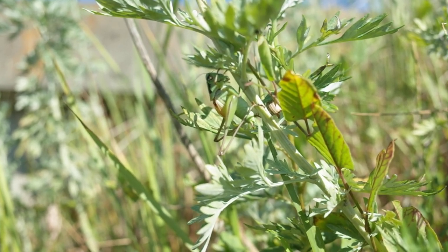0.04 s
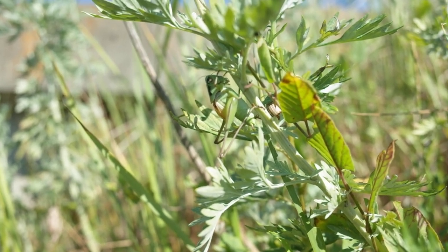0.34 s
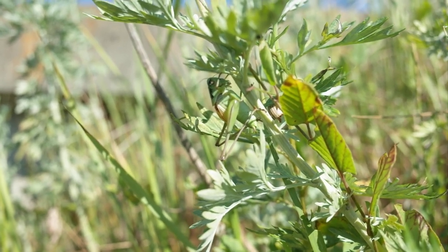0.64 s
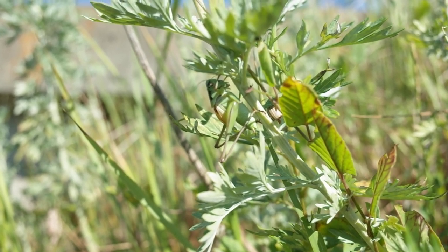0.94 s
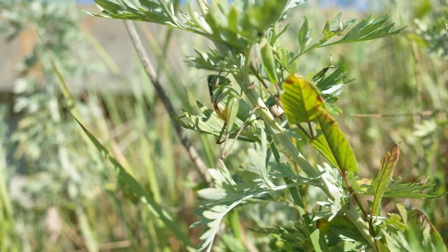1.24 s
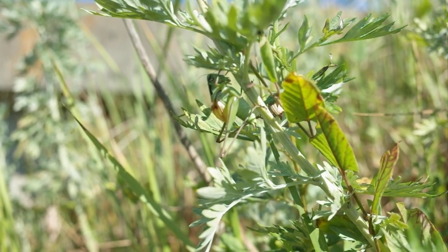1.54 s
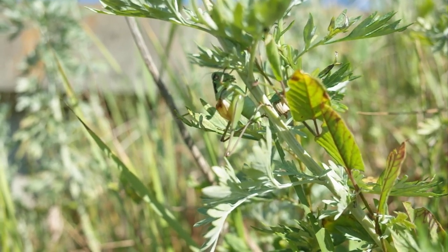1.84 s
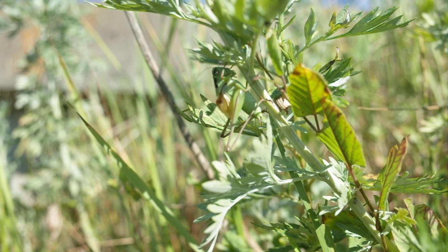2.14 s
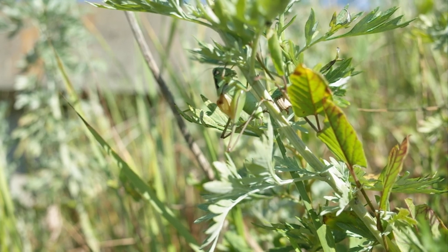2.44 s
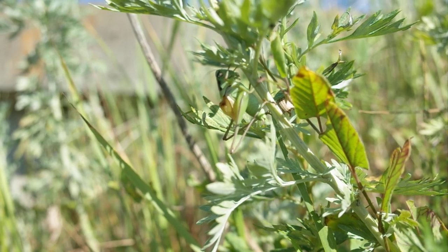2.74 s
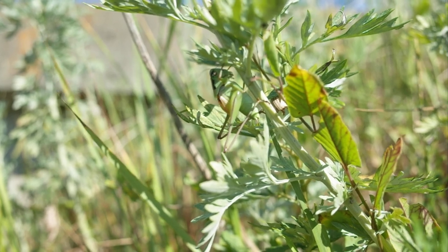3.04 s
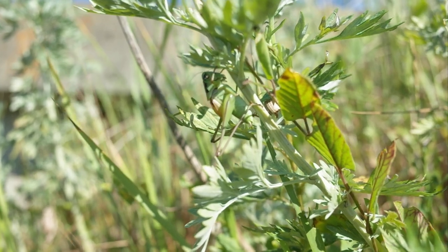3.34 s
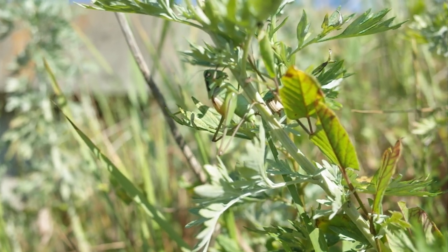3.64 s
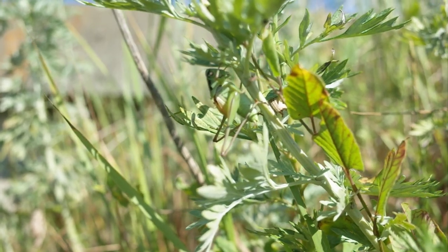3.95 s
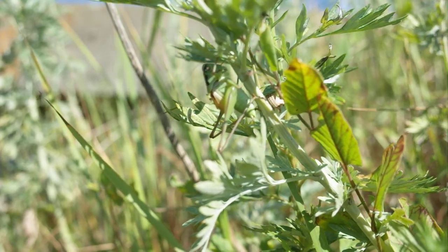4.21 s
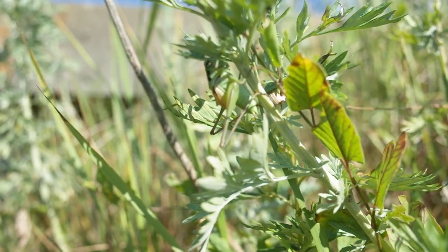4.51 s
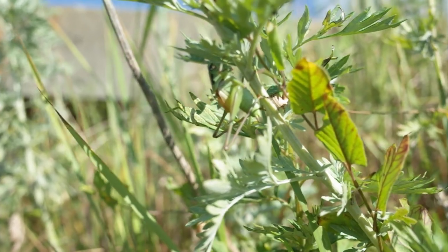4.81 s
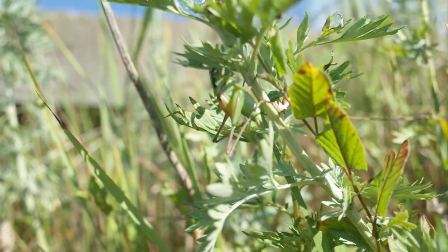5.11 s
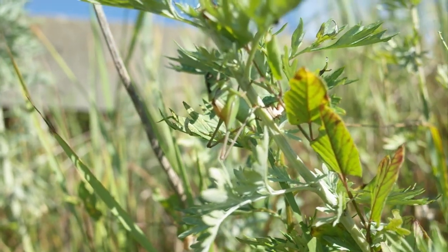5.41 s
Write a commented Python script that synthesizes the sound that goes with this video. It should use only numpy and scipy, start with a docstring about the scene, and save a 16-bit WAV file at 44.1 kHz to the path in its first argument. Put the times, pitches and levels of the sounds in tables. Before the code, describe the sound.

In a meadow, a nearby bush cricket gives a short run of high, pulsing chirps. Another, right beside the stereo microphone, takes over with a much louder, sharp, rapid buzzing song lasting about two seconds. More distant crickets follow with softer, overlapping runs, joined by a few faint stalk ticks and a barely audible passing fly, over quiet open air and a thin haze of far-off insects.

```python
"""Bush crickets in sunny weeds

Each syllable is a soft wing opening, then a loud closing stroke in which the scraper clicks over the
file tooth by tooth. One cricket sings for two seconds right at the stereo microphone and pushes the
camera's gain control down. Others sing further off, over a passing fly, ticking stalks, a low hum
and a faint outdoor rush."""
import sys
import numpy as np
from scipy import signal
from scipy.fft import rfft, irfft, next_fast_len
from scipy.io import wavfile
from scipy.ndimage import uniform_filter1d, minimum_filter1d, map_coordinates

SR = 44100
rng = np.random.default_rng(int(sys.argv[2]) if len(sys.argv) > 2 else 0)


def persist_wave(psi):
    """Save psi, clipped to +-1, as 16-bit WAV."""
    counts = np.round(np.clip(psi, -1, 1) * 32767).astype(np.int16)
    wavfile.write(sys.argv[1], SR, np.atleast_2d(counts).T)


N = 245637


# The song at the microphone. Each row: syllable end in seconds, snap (extra closing force) in dB.
NEAR_SYLLABLES = [(1.269, -0.5), (1.355, 5), (1.449, 2.9), (1.549, 3.5), (1.649, 1), (1.736, 3.5),
                  (1.841, 2.5), (1.934, 2.5), (2.029, 1), (2.129, 2.5), (2.224, 2), (2.321, 0.5),
                  (2.415, 3), (2.513, 4.5), (2.614, 4.5), (2.713, -0.5), (2.817, 3.5), (2.91, 1.5),
                  (3.017, 2.5)]
def near_song(level_db=11.5, first_length_s=.1):
    """Syllables that follow without a gap, as (end s, length s, level dB, snap dB)."""
    end, snap_db = np.transpose(NEAR_SYLLABLES)
    length = np.diff(end, prepend=end[0] - first_length_s)
    return np.column_stack([end, length, np.full(len(end), level_db), snap_db])


# The halting first syllable. Its row: end and length in seconds, level and snap in dB.
FIRST_SYLLABLE = [(1.162, .089, 5.3, 1.5)]
# The wings open, catch and close. Each row is one sweep: start and end as shares of the syllable,
# crest as a share of the sweep, peak and swell in dB, base teeth per second, jitter in tooth spacings.
FULL_STROKE = [(0, 0.268, 0.54, -18, 28, 2600, .4), (0.326, 0.469, 0.69, -12.5, 2, 2400, 0.42),
               (.48, 1, 0.74, -1.5, 8.5, 810, .1)]
HALTING_STROKE = [(.02, .35, .75, -9, 10, 1500, 0.186), (.41, .58, 0.22, -.5, 2.5, 1313, .25),
                  (0.535, 1.026, 0.59, 4.5, 9, 476.4, .2)]
# The wing's resonance from close up. Each row: frequency in Hz, relative level in dB.
NEAR_WING = [(700, -61), (2500, -55.5), (4500, -48), (5900, -36), (6930, -24), (8000, -13.5), (9000, -2.5),
             (9380, 1.5), (9800, -2.5), (10400, -2.53), (11500, -6.5), (12600, -6), (14900, -19.5),
             (15900, -20.5)]
def near_cricket():
    """Right at the microphone, with little scatter off leaves: a halting start, then full song."""
    leaves = (-9.5, .012)  # scatter dB, decay s
    song = cricket(near_song(), FULL_STROKE, NEAR_WING, leaves,
                   darken=1.62, right_lag_us=7.3, left_db=.5, uneven_db=2.08)
    start = cricket(FIRST_SYLLABLE, HALTING_STROKE, NEAR_WING, leaves,
                    darken=.42, right_lag_us=7.1, left_db=-1)
    return song + start


def cricket(syllables, stroke, wing, leaves, darken, right_lag_us, left_db, uneven_db=2.94):
    """Tooth strikes ring the wing, which starts its closing stroke bright and darkens towards the end."""
    at, size, progress = teeth(syllables, stroke, uneven_db)
    closing = progress > .335
    brightness = np.clip(darken * (.92 - progress), -.7, .7) * closing
    tilt = filtered(clicks(at, size * brightness), lambda hz: np.tanh((hz - 10300) / 1200))
    song = signal.oaconvolve(clicks(at, size) + tilt, ring(wing))[:N]
    sides = np.array([[.5], [-.5]])  # left, right
    pair = filtered(song, lambda hz: np.exp(2j * np.pi * hz * sides * right_lag_us / 1e6))
    return foliage(amp(sides * left_db) * pair, *leaves)


def teeth(syllables, stroke, uneven_db, snap_share=.82, snap_width_s=.0083):
    """Every strike of scraper on file: its time in samples, its size, its place in the syllable (0-1)."""
    strikes = []
    for end, length, db, snap_db in syllables:
        pace = np.exp(.048 * rng.standard_normal())  # wing speed differs between syllables
        for begin, finish, crest, peak_db, swell_db, rate, jitter in stroke:
            span = finish - begin
            part, force = sweep(length * span, crest, swell_db, rate * pace, jitter)
            progress = begin + span * part
            snap = snap_db * np.exp(-((progress - snap_share) * length / snap_width_s) ** 2)
            uneven = uneven_db * rng.standard_normal(256)[:len(part)]
            size = force * amp(db + peak_db + snap + uneven)
            strikes.append([(end - length * (1 - progress)) * SR, size, progress])
    return np.concatenate(strikes, axis=1)


def sweep(seconds, crest, swell_db, rate, jitter, release_db=7.5, steps=256):
    """One pass of the scraper over the file: where in it each tooth is struck (0-1), and how hard."""
    u = np.linspace(0, 1, steps)
    drive = 1 + .5 * np.exp(-(u / .27) ** 2) + .35 * u ** 2  # sets off fast, settles, gathers speed
    brake = 1 - .38 * np.exp((u - 1) / .09)  # slows just before it lifts
    speed = rate * drive * brake
    passed = np.cumsum(speed) * seconds / steps
    slip = rng.standard_normal(steps)[:int(passed[-1])]
    tooth = np.arange(len(slip)) + rng.random()
    loose = .1515 * (2 * np.interp(tooth, passed, u) - 1) ** 6  # more jitter on landing and lifting
    part = np.interp(tooth + slip * (jitter + loose), passed, u)
    crest = np.clip(crest, .05, .95)
    swell = swell_db * np.maximum(1 - part / crest, 0) ** 1.71
    release = release_db * np.maximum((part - crest) / (1 - crest), 0) ** 2.58
    return part, amp(-swell - release) * np.sqrt(SR / np.interp(part, u, speed))


def wing_rasp(syllables, gain_db=-44, flutter_db=4.5):
    """Between the loud strokes the wings rub with a lower, uneven, toothless scrape."""
    gate = np.zeros(N)
    for end, length, db, _ in syllables:
        progress = 1 + (np.arange(N) / SR - end) / length
        gate += amp(db) * (progress > .018) * (progress < .48)
    rubbing = uniform_filter1d(gate, SR // 250) * amp(flutter_db * wobble(110))
    colour = [(1200, -31), (3000, -17), (5000, -9), (7000, -4), (10000, -9)]  # Hz, dB
    return amp(gain_db) * rubbing * stereo_noise(colour, likeness=[(5000, 1)])


# Runs of song further from the microphone. Each row: ends of the first and last syllables in seconds,
# syllable count, first and last level in dB relative to the singer's own, slowing as a share.
NEIGHBOUR_RUNS = [(.62, 1.121, 7, -3.5, -.5, 0), (4.413, 5.384, 12, -.5, 0, .068)]
BEHIND_RUNS = [(3.047, 3.682, 8, -1, 0, 0), (3.775, 4.225, 6, -3.7, -1.5, .06),
               (4.32, 4.96, 8, -3, -5.5, 0)]
DULL_RUNS = [(.022, .405, 5, 0, -1.5, 0), (5.49, 5.58, 2, -5.5, -6.5, 0)]
BRIGHT_RUNS = [(.1, .54, 6, -9, 0, 0)]
# Their wing movements. Each row: one sweep, with the columns of FULL_STROKE.
SLOW_STROKE = [(0.177, 0.357, 0.14, -11.5, 1.7, 1000, .4), (0.342, 0.535, 0.44, -12.5, 6, 1000, .38),
               (0.527, 1.022, 0.83, 0, 6, 351.2, 0.0988)]
SOFT_STROKE = [(0, 0.329, 0.34, -12.5, 2, 1050, 0.372), (0.321, 0.544, 1, -6, 3.4, 998, .35),
               (0.496, 1.011, 0.4, 0.5, 14, 693.7, 0.1514)]
# Their wing resonances. Each row: frequency in Hz, relative level in dB.
NEIGHBOUR_WING = [(3200, -46), (5800, -41), (6600, -26), (7500, -13), (8200, -3.5), (8900, 3.5),
                  (9500, -3.5), (10200, -8), (11400, -3.5), (12600, -4.5), (13900, -11), (15100, -13.5),
                  (15900, -55.5)]
BEHIND_WING = [(3200, -77), (5500, -32), (6800, -18.5), (7700, -8), (8700, 4), (10000, -4.5), (11900, -2),
               (12600, -3.5), (13600, -15.5), (15100, -18), (15800, -30)]
DULL_WING = [(5000, -38), (7500, -18), (8500, -5), (9100, 3), (10000, -6), (11500, -12.5), (15000, -26)]
BRIGHT_WING = [(5000, -38), (7500, -8), (9300, 3.5), (11000, -1), (12700, 4.5), (14300, 1), (15700, -24)]
def further_crickets():
    """A neighbour, one behind it and two deep in the weeds: the further off, the more leaf scatter."""
    neighbour = cricket(steady_song(NEIGHBOUR_RUNS, level_db=-19), SLOW_STROKE, NEIGHBOUR_WING,
                        leaves=(-4.5, .035), darken=1.13, right_lag_us=-111, left_db=-.5, uneven_db=3)
    behind = cricket(steady_song(BEHIND_RUNS, level_db=-20), SOFT_STROKE, BEHIND_WING,
                     leaves=(-1, .04), darken=.094, right_lag_us=68.3, left_db=1.5)
    dull = cricket(steady_song(DULL_RUNS, level_db=-35.5), SOFT_STROKE, DULL_WING,
                   leaves=(6, .05), darken=1, right_lag_us=0, left_db=-.5)
    bright = cricket(steady_song(BRIGHT_RUNS, level_db=-35), SOFT_STROKE, BRIGHT_WING,
                     leaves=(6, .05), darken=.19, right_lag_us=0, left_db=1.5)
    return neighbour + behind + dull + bright


def steady_song(runs, level_db, spread_db=.12):
    """Syllables without a snap, at an even or gently slowing pace, their level drifting over the run."""
    syllables = []
    for first, last, count, first_db, last_db, slowing in runs:
        part = np.linspace(0, 1, count)
        end = first + (last - first) * part * (1 - slowing * (1 - part))
        length = np.diff(end, prepend=2 * end[0] - end[1])
        db = level_db + first_db + (last_db - first_db) * part + spread_db * rng.standard_normal(count)
        syllables += zip(end, length, db, np.zeros(count))
    return syllables


def foliage(direct, scatter_db, t60, paths=4, sway_rate=5):
    """The direct sound and its scatter off swaying leaves, different at each side of the microphone."""
    t = np.arange(SR // 12) / SR
    tails = rng.standard_normal((paths, 2, len(t))) * amp(-60 * t / t60) * (1 - np.exp(-t / .0027))
    tails *= amp(scatter_db) / np.linalg.norm(tails, axis=2, keepdims=True)
    sway = np.array([wobble(sway_rate) for _ in range(paths)])
    sway /= np.linalg.norm(sway, axis=0)  # the paths trade strength at constant power
    scatter = sum(share * signal.oaconvolve(direct, tail, axes=1)[:, :N]
                  for share, tail in zip(sway, tails))
    return (direct + scatter) / np.hypot(1, amp(scatter_db))


# A fly passing the microphone. Each row: time in seconds, wingbeat in Hz, level in dB.
FLY_PATH = [(4.1, 250, -103.5), (4.352, 247.8, -58), (4.55, 242.2, -53), (4.679, 241, -62.5),
            (4.85, 233.8, -59.5), (5.1, 229.9, -70), (5.45, 232, -59), (5.57, 232, -61)]
# Its buzz. Each row: multiple of the wingbeat, relative level in dB.
FLY_HARMONICS = [(1, -2.5), (2, 1), (3, -9), (4, -9), (5, -9.5)]
def fly():
    """Beating wings buzz faintly, sinking in pitch as the fly drifts past."""
    times, hz, db = np.transpose(FLY_PATH)
    t = np.arange(N) / SR
    wingbeat_hz = np.interp(t, times, hz) * (1 + .0066 * wobble(16))
    phase = 2 * np.pi * np.cumsum(wingbeat_hz) / SR
    buzz = sum(amp(level) * np.sin(k * phase) for k, level in FLY_HARMONICS)
    return amp(np.interp(t, times, db)) * unit(buzz)


# Ticks among the weeds. Each row: start in seconds, gain in dB.
STALK_TICKS = [(3.258, -53.5), (3.913, -54), (4.181, -37), (4.698, -51)]
# A stalk's ring. Each row: frequency in Hz, relative level in dB, seconds to fall by 60 dB.
STALK_MODES = [(2240, 0, 0.041), (2440, 6.5, 0.0089), (3230, 0.5, 0.022)]
def stalks():
    """Dry stalks tick: a crack and a short ring."""
    t = np.arange(SR // 8) / SR
    ringing = sum(amp(db - 60 * t / t60) * np.sin(2 * np.pi * hz * t) for hz, db, t60 in STALK_MODES)
    crack = .79 * amp(-60 * t / .11) * rng.standard_normal(len(t))
    starts, db = np.transpose(STALK_TICKS)
    return signal.fftconvolve(clicks(starts * SR, amp(db)), ringing + crack)[:N]


# Open air and far-off insects. Each row: frequency in Hz, relative level in dB.
AIR_SPECTRUM = [(12, -53), (20, -15), (60, -11.5), (126, -12.5), (424, -17), (467, -18), (514, -18.5),
                (828, -21.5), (1160, -23.5), (1690, -25.5), (3380, -28), (4000, -25.5), (6000, -33),
                (7800, -87), (13200, -120)]
CHORUS_SPECTRUM = [(4500, -26), (7000, -12), (9200, 0), (10500, -4), (12500, -7), (14500, -10),
                   (15800, -20)]
# The air's width at the microphone. Each row: frequency in Hz, left-right likeness from 0 to 1.
AIR_LIKENESS = [(50, 1), (130, 0.3), (500, 0.47), (2000, 0.11), (6000, 0)]
# A low hum. Each row: time in seconds, level in dB.
HUM_LEVELS = [(0, -56.5), (1, -55.5), (3.5, -64), (5.57, -59)]
def meadow(air_db=-51, breeze_db=.5, hum_hz=58, chorus_db=-48):
    """All around the microphone: outdoor rush, a faint wavering hum and the blur of distant insects."""
    air = amp(air_db + breeze_db * wobble(6.9)) * stereo_noise(AIR_SPECTRUM, AIR_LIKENESS)
    hum_db = np.interp(np.arange(N) / SR, *np.transpose(HUM_LEVELS)) + 2 * wobble(3.05)
    hum_phase = 2 * np.pi * np.cumsum(hum_hz + 5 * wobble(11)) / SR
    hum = amp(hum_db) * unit(np.sin(hum_phase))
    chorus = amp(chorus_db + 5.5 * wobble(30)) * stereo_noise(CHORUS_SPECTRUM, likeness=[(9000, .19)])
    return air + hum + chorus


def amp(db):
    """Decibels to gain."""
    return 10 ** (np.asarray(db) / 20)


def unit(x):
    """Scale to rms 1."""
    return x / np.sqrt(np.mean(x ** 2) + 1e-20)


def along(points, hz):
    """Interpolate (Hz, value) points on a log frequency axis."""
    knots, values = np.transpose(points)
    return np.interp(np.log(hz + 1), np.log(knots + 1), values)


def wobble(rate):
    """A smooth random curve, rate knots a second."""
    return map_coordinates(rng.standard_normal(int(N * rate / SR) + 4), [np.arange(N) * rate / SR])


def filtered(x, response):
    """Pass x through a complex frequency response."""
    size = next_fast_len(N + SR // 4)
    return irfft(rfft(x, size) * response(np.fft.rfftfreq(size, 1 / SR)), size)[..., :N]


def ring(spectrum, size=2048):
    """Causal impulse response of energy 1 with the given colour."""
    magnitude = amp(along(spectrum, np.fft.rfftfreq(size, 1 / SR)))
    cepstrum = irfft(np.log(magnitude + 1e-4))
    cepstrum[1:size // 2] *= 2  # fold to minimum phase
    cepstrum[size // 2 + 1:] = 0
    response = irfft(np.exp(rfft(cepstrum)))
    return response / np.linalg.norm(response)


def clicks(at, sizes, order=8):
    """Impulses placed between samples by a windowed sinc."""
    index = np.floor(at).astype(int)[:, None] + np.arange(1 - order, order + 1)
    offset = index - at[:, None]
    shape = np.sinc(offset) * np.cos(np.pi * offset / (2 * order)) ** 2 * ((index >= 0) & (index < N))
    return np.bincount(np.clip(index, 0, N - 1).ravel(), (shape * sizes[:, None]).ravel(), N)


def stereo_noise(spectrum, likeness):
    """Noise of rms 1 with the given colour and left-right likeness."""
    def response(hz):
        angle = np.arccos(np.clip(along(likeness, hz), -1, 1)) / 2
        return amp(along(spectrum, hz)) * [np.cos(angle), np.sin(angle)]
    mid, side = filtered(rng.standard_normal((2, N)), response)
    return unit(np.array([mid + side, mid - side]))


def scene():
    """Everything that reaches the stereo microphone in the weeds."""
    return near_cricket() + further_crickets() + wing_rasp(near_song()) + fly() + stalks() + meadow()


def gain_control(x, limit_db=-6.5, window_s=.0055, attack_s=.0086, hold_s=.08, release_db_per_s=20.5):
    """The camera's gain drops quickly on loud sound, holds for a moment and creeps back."""
    power = np.abs(uniform_filter1d(np.mean(x ** 2, axis=0), int(window_s * SR)))
    excess_db = np.maximum(10 * np.log10(power + 1e-12) - limit_db, 0)
    hold = int(hold_s * SR)
    held_db = -minimum_filter1d(-excess_db, hold, origin=(hold - 1) // 2)
    creep_db = release_db_per_s * np.arange(N) / SR
    cut_db = np.maximum.accumulate(held_db + creep_db) - creep_db
    pole = np.exp(-1 / (attack_s * SR))
    return x * amp(-signal.lfilter([1 - pole], [1, -pole], cut_db))


def record(dry, lopsided=.031, full_scale=.97, top_hz=15950):
    """Gain control, a slightly lopsided overload that clips the sharpest clicks, and the band limit."""
    x = gain_control(dry)
    x = x + lopsided * filtered(x ** 2, lambda hz: hz ** 2 / (hz ** 2 + 200 ** 2))
    x = np.clip(x, -full_scale, full_scale)
    return filtered(x, lambda hz: 1 / (1 + (hz / top_hz) ** 200))


dry = scene()
out = record(dry)
persist_wave(out)
```